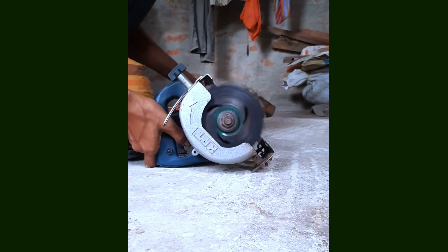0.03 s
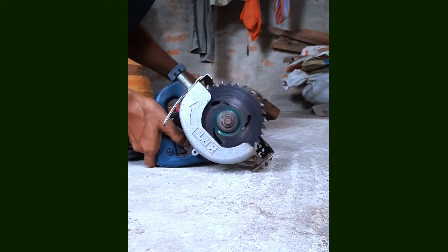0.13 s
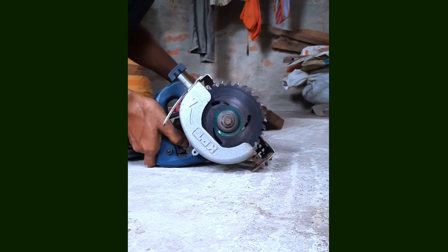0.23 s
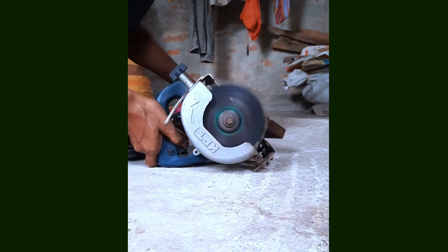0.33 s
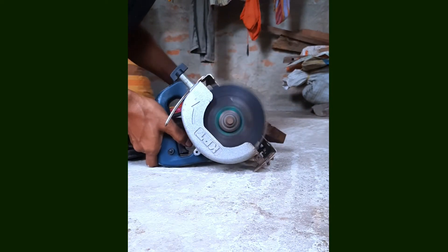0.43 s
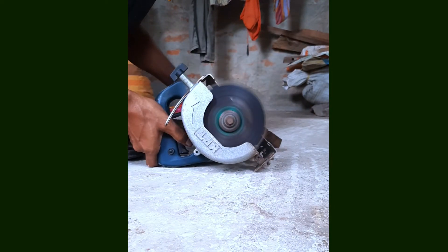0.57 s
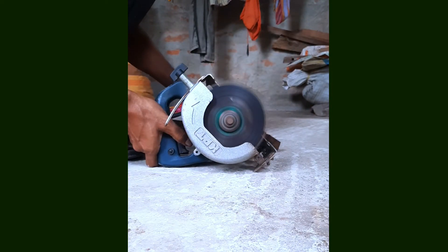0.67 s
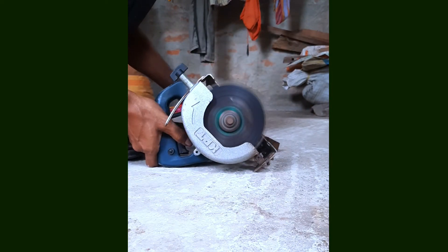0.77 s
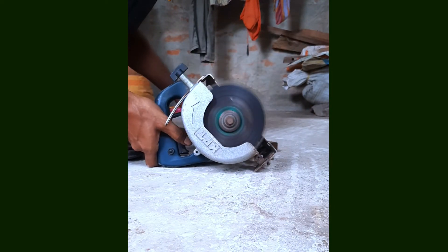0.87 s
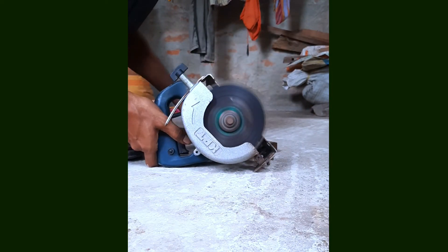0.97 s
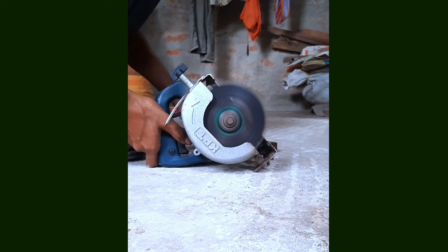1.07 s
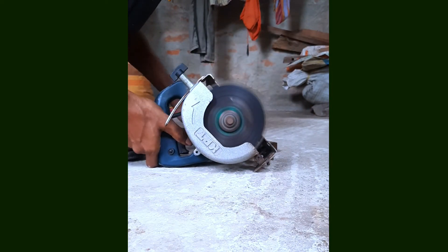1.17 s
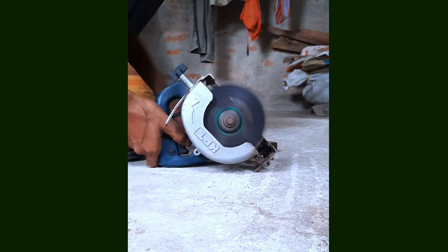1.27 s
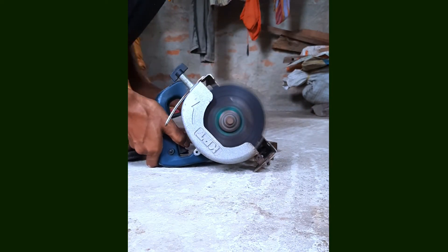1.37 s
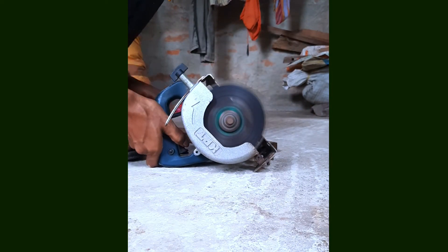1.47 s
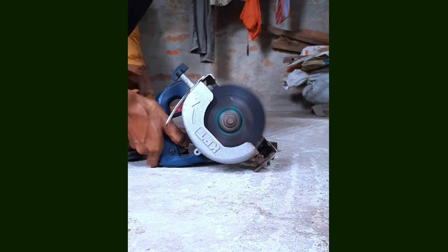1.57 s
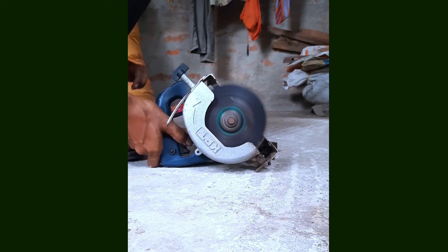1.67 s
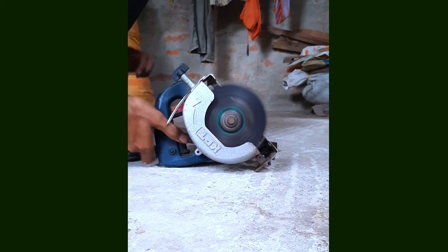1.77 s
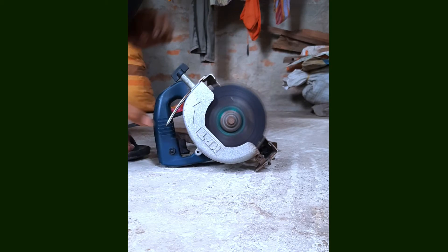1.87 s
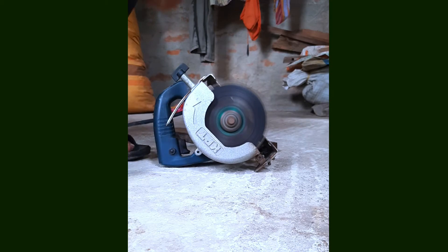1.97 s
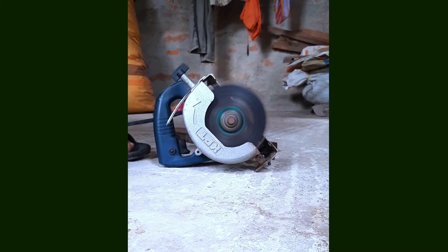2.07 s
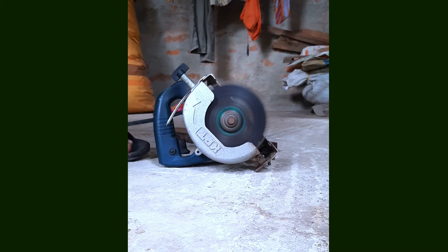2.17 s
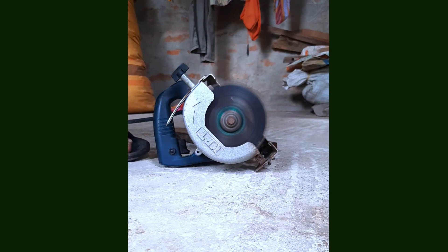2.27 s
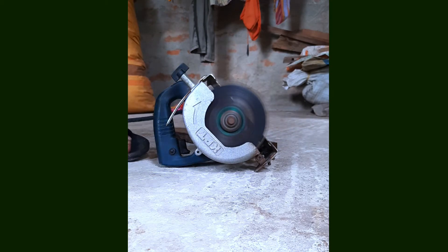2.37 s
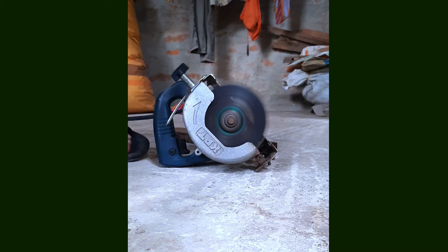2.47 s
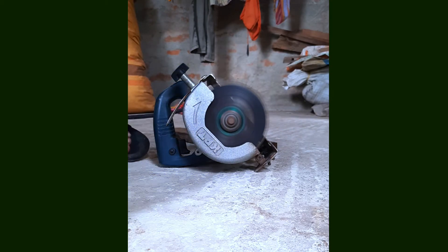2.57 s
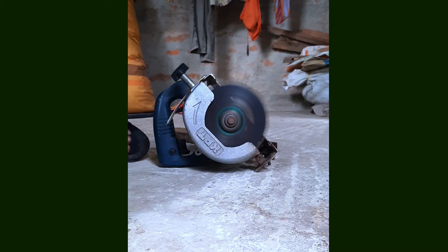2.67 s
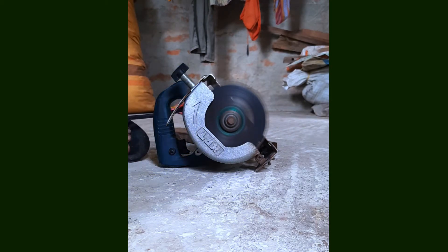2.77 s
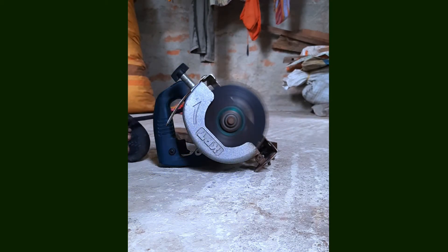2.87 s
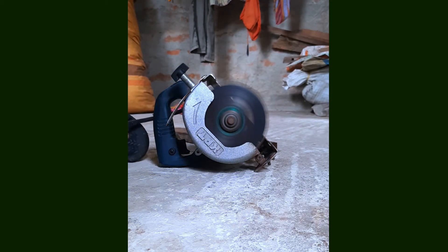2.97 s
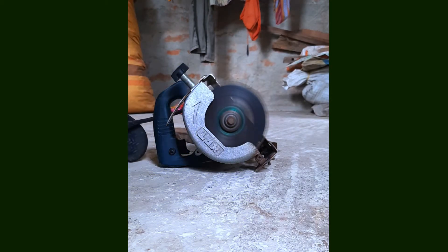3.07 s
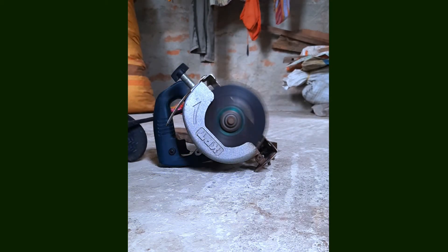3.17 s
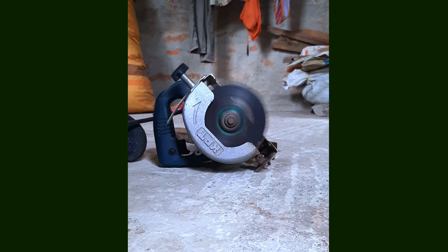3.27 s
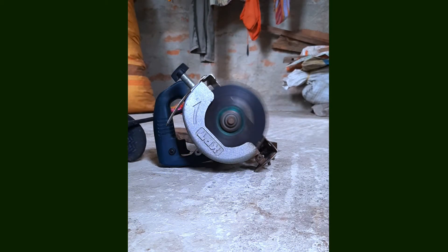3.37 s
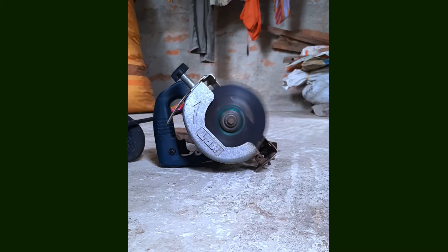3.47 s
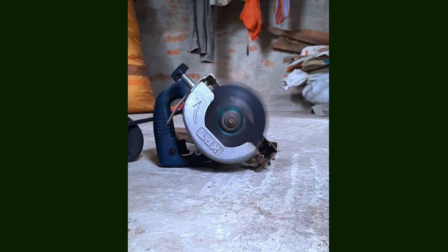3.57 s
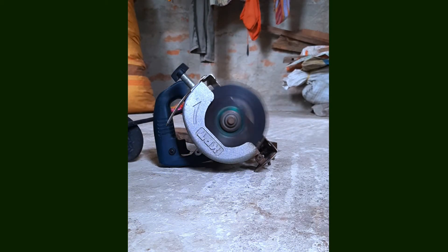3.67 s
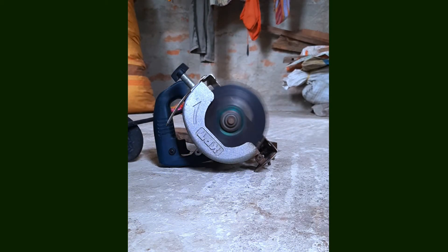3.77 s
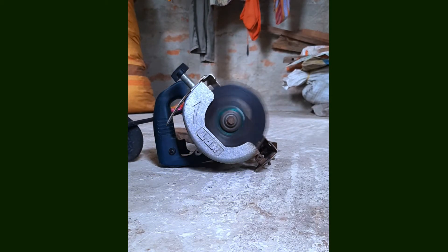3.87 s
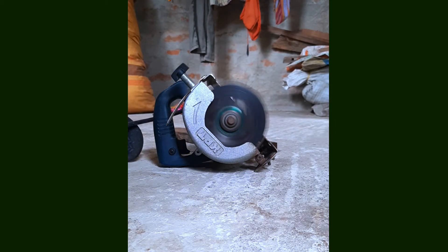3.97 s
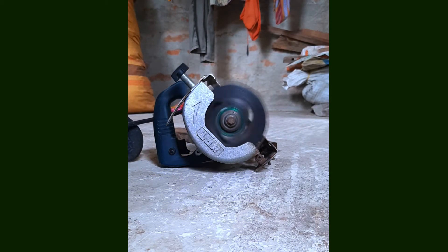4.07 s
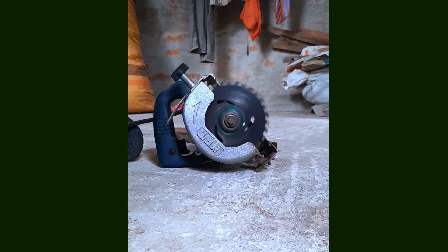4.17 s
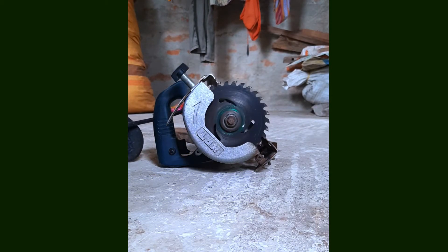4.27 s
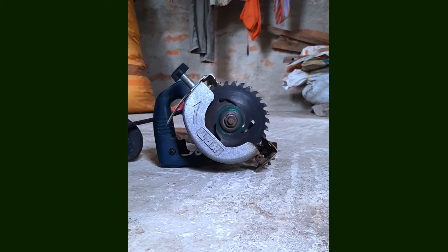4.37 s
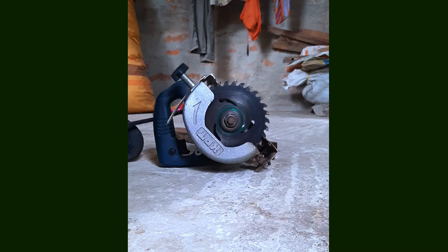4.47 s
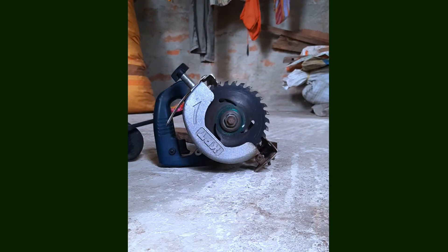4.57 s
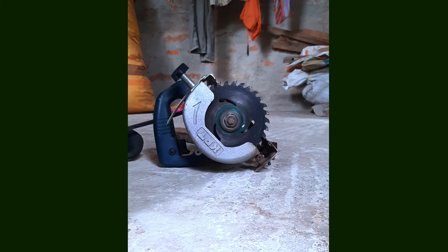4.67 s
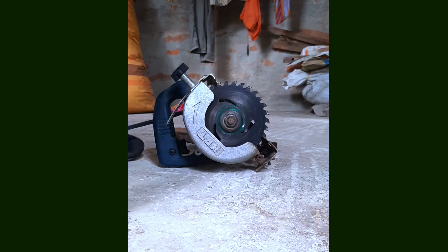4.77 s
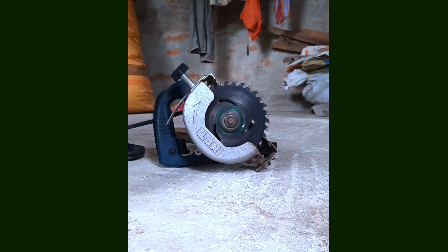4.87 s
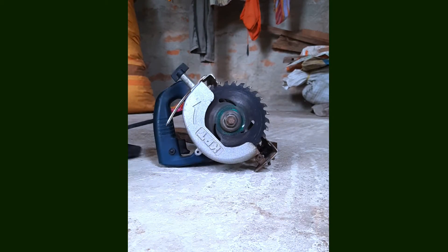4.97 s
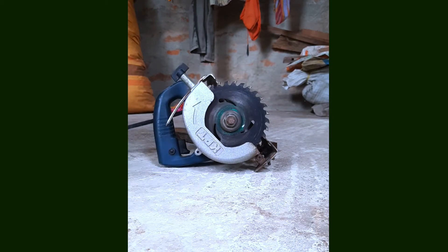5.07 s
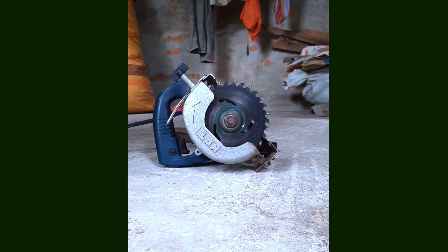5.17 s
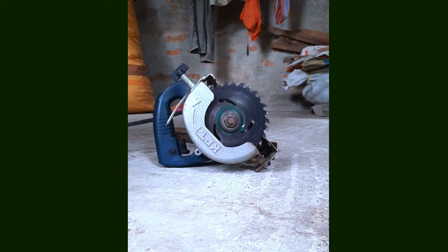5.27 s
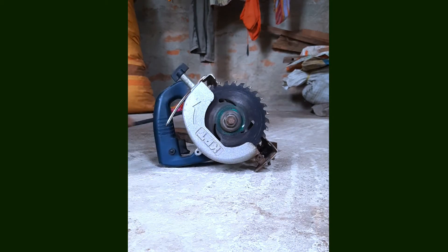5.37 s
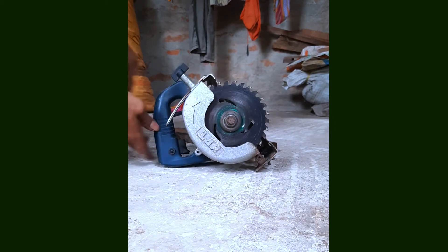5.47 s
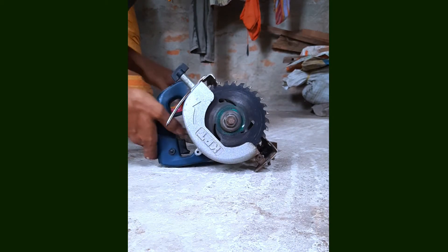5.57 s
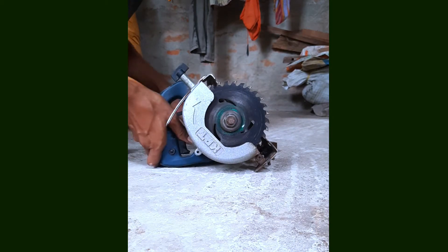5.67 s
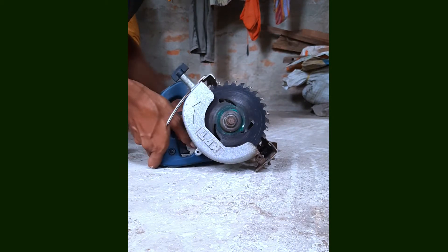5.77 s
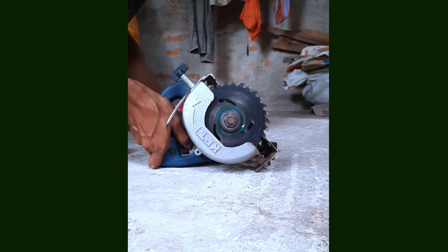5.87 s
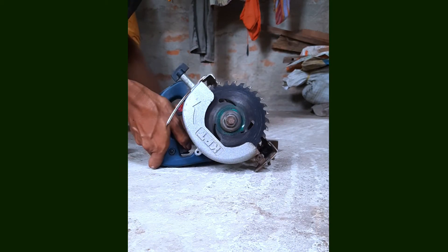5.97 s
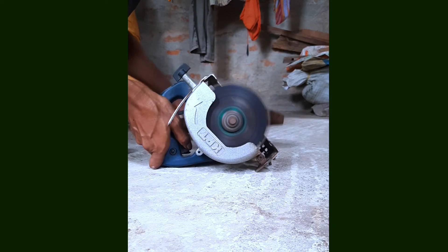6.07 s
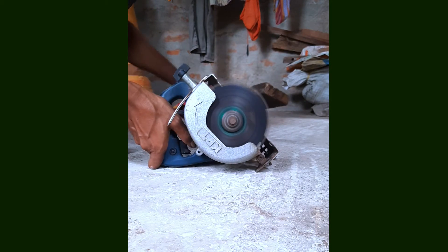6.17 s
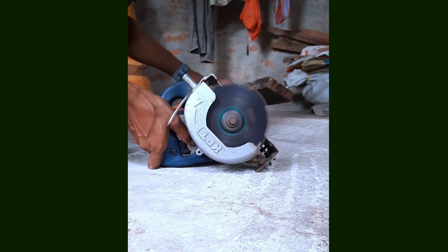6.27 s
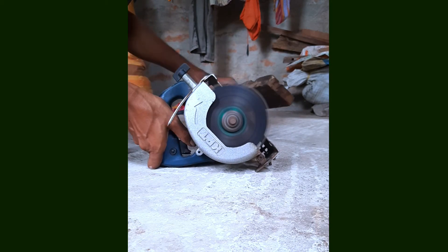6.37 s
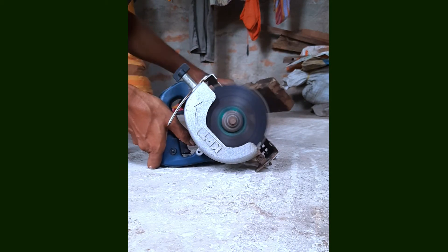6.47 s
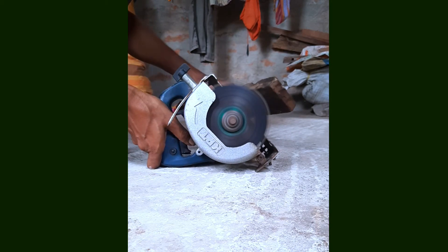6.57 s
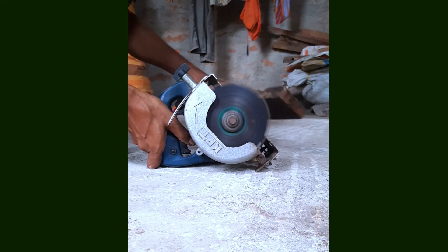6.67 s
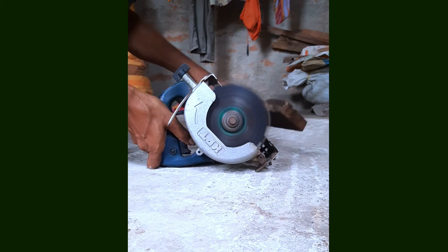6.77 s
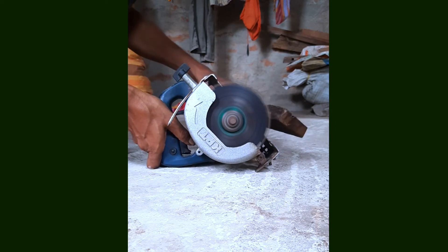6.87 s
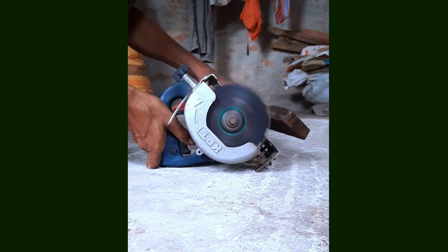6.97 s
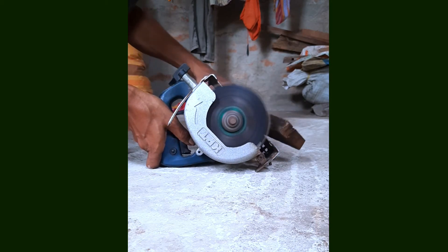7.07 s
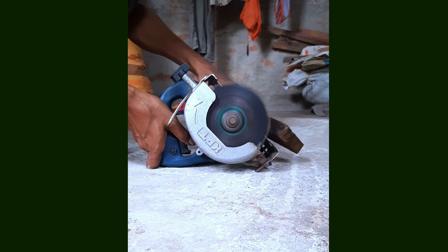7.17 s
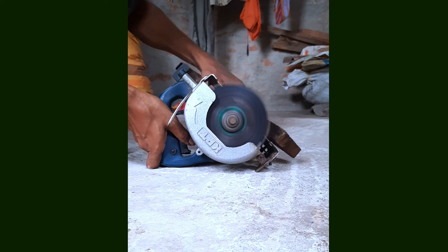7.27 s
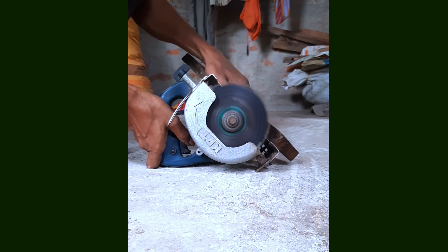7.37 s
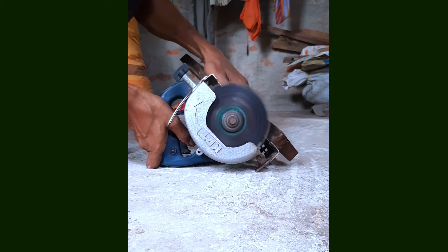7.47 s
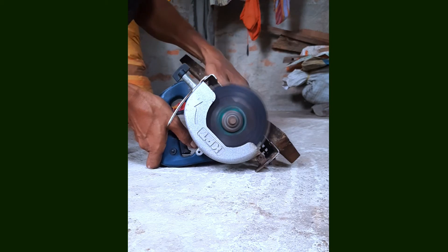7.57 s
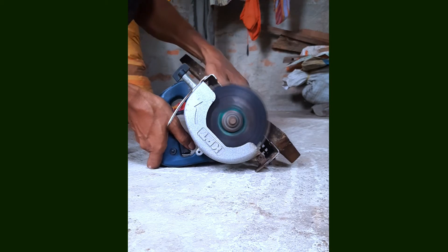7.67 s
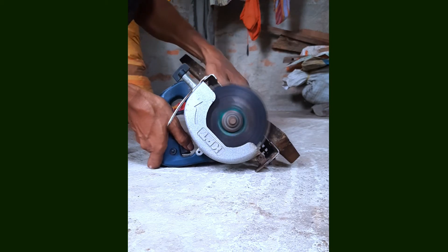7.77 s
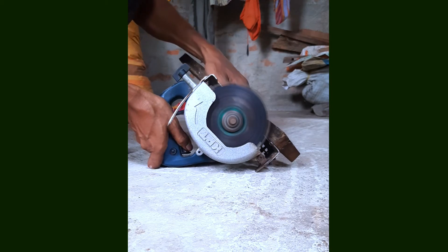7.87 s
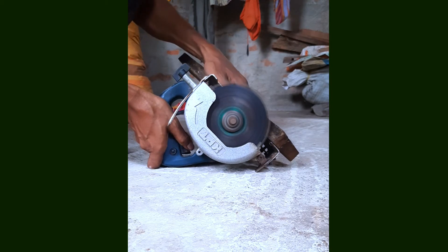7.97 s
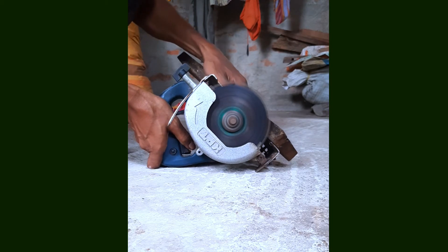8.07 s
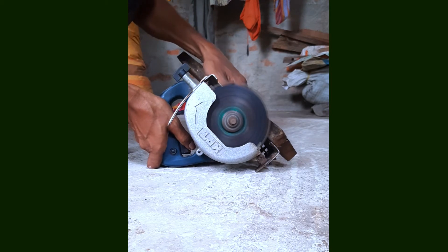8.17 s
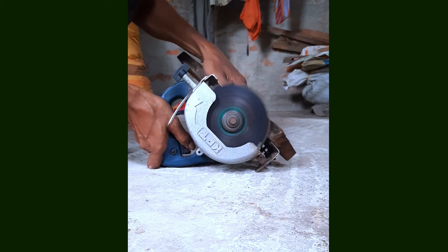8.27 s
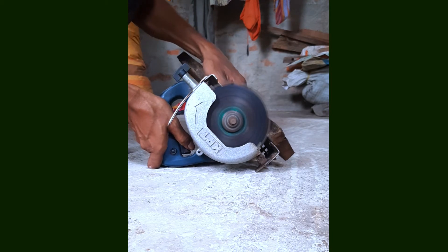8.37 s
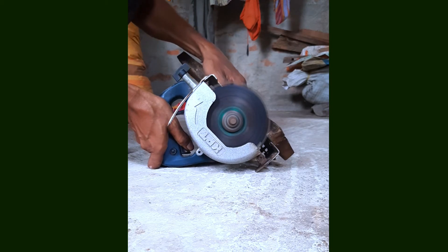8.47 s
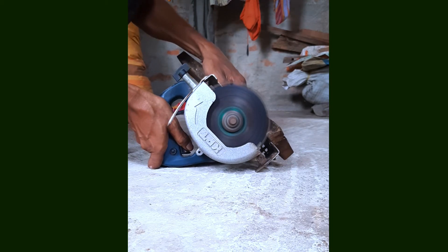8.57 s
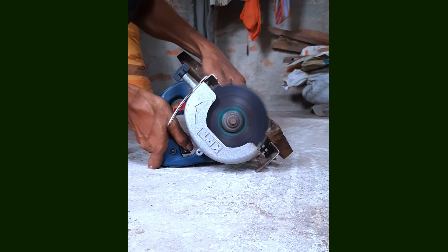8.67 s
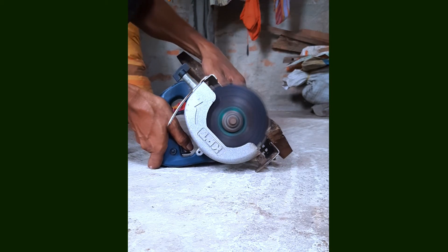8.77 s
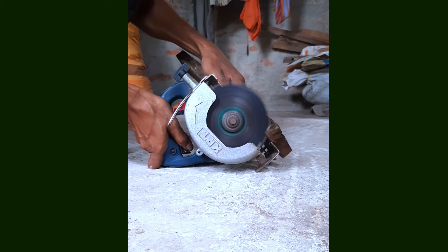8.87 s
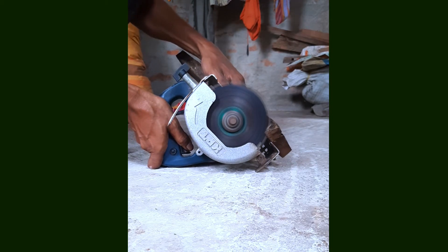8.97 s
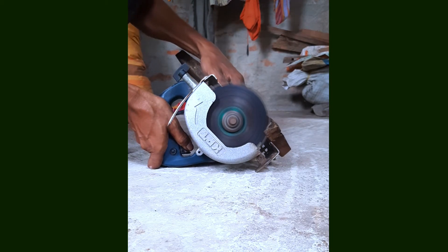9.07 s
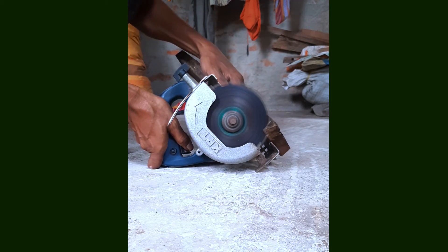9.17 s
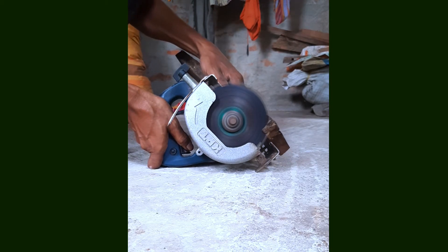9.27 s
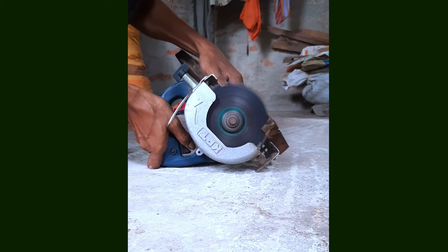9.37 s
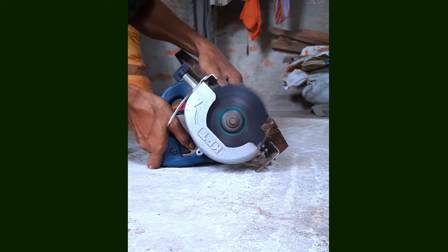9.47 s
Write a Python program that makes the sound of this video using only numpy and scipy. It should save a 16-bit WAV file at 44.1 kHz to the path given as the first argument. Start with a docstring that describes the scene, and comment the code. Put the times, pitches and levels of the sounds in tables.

```python
"""On a workshop floor a motor-driven saw with a toothed steel blade lies near a phone with two microphone ports.
The trigger is blipped four times: gear play knocks while current flows, then the whine, a sum of sines locked
to the rotor, sinks as friction brakes it; at last wood is pushed on the blade and noise bands and modes ring.
Dust puffs on the left port are damped swings and low noise; scuffs of hand and feet are filtered noise.
Engines idling outside are multiples of a firing rate over dull traffic noise and a steady hiss."""
import sys
import numpy as np
from scipy import signal
from scipy.fft import rfft, irfft, next_fast_len
from scipy.io import wavfile
from scipy.ndimage import uniform_filter1d

SR = 44100
rng = np.random.default_rng(int(sys.argv[2]) if len(sys.argv) > 2 else 0)


def transcribe(signal):
    """Save signal, clipped to [-1, 1], as a 16-bit WAV file at the path in sys.argv[1]."""
    frames = np.atleast_2d(signal).T
    limited = np.clip(frames, -1, 1)
    pcm = np.round(limited * 32767).astype(np.int16)
    wavfile.write(sys.argv[1], SR, pcm)


N = 419832
T = np.arange(N) / SR
SIZE = next_fast_len(N + SR // 2)
HZ = np.arange(SIZE // 2 + 1) * SR / SIZE + 1e-3  # the offset keeps divisions and logarithms finite

# Squeezes of the trigger. Each row: press in seconds, hold in seconds, gear mesh rate in Hz that the
# motor pulls towards, relative level in dB.
SPINS = [(.3845, .14, 2961, 0), (1.660, .14, 3223, .5), (6.0863, .1385, 3151, -0.27),
         (7.954, 0.164, 3260, 0.8)]
# The rotor under load, bogging down and recovering. Each row: time in seconds, mesh rate in Hz,
# whine in dB relative to the rattle.
LOADED = [(8.4, 2800, 0), (8.5, 2620, 0), (8.59, 2410, -3), (8.65, 2420, -12), (8.95, 2520, -12),
          (9.02, 2600, -3), (9.1, 2720, -3), (9.18, 2640, -12), (9.3, 2670, 0), (9.4, 2735, -1),
          (9.52, 2765, -5)]
# Loudness of the cut. Each row: time in seconds, rattle in dB, air hiss in dB, screech above 3 kHz
# in dB over the rattle (capped where it is used).
CUT = [(8.4, -30.5, -35.5, 0), (8.536, -27.5, -29, -2.5), (8.558, -26, -29, -2), (8.58, -28.5, -31.5, -1),
       (8.658, -27.5, -27.5, -3.5), (8.718, -24.5, -30, -5), (8.802, -24.5, -27, -1),
       (8.896, -28, -29.5, -6), (8.902, -27, -27.5, -2), (9.054, -27, -28, -5.5), (9.104, -26, -26.5, -7),
       (9.132, -28, -28.5, -4), (9.416, -25.5, -25.5, -5), (9.47, -28.5, -29.5, -3), (9.52, -25.5, -25, -7)]
# Wood on the blade. Each row: time in seconds, share that the blade rings 0-1, hum in dB.
BITE = [(8.4, 0, -40), (8.5, 0.9, -44.5), (8.6, 0.99, -50), (8.74, 0.93, -46), (8.86, 0.87, -41.5),
        (9.2, 0.58, -41), (9.35, 0.77, -38.5), (9.52, .55, -38.5)]
# Resonances of the housing. Each row: centre in Hz, width in Hz, relative level in dB.
HOUSING = [(440, 40, -7), (613, 18, -2), (690, 20, -4), (1216, 30, -7), (1433, 30, -2), (1606, 36, -3),
           (1816, 32, 1), (2181, 36, -4), (2440, 20, 4), (2716, 70, -2), (2803, 22, 2), (3363, 28, -4),
           (4326, 24, -2), (4420, 110, -9), (7550, 100, -12), (8780, 280, -17), (12100, 360, -18),
           (14150, 900, -15)]


def undb(db):
    """Amplitude ratio from decibels: 20 dB is a factor of ten."""
    return 10 ** (np.asarray(db) / 20)


def unit(x):
    """Normalisation to an RMS of one."""
    return x / np.sqrt(np.mean(x ** 2))


def over_hz(table):
    """Interpolation of (Hz, value) points on a logarithmic frequency axis."""
    hz, value = np.transpose(table)
    return np.interp(np.log(HZ), np.log(hz), value)


def over_time(table, column):
    """Linear interpolation in time of one column against the seconds in column 0."""
    columns = np.transpose(table)
    return np.interp(T, columns[0], columns[column])


def filt(x, gain):
    """Linear filtering: the spectrum is multiplied by a frequency response."""
    return irfft(rfft(x, SIZE) * gain, SIZE)[..., :N]


def band(x, lo_hz, hi_hz):
    """Zero-phase band-pass with fourth-order Butterworth magnitude at each edge."""
    return filt(x, 1 / np.sqrt((1 + (lo_hz / HZ) ** 8) * (1 + (HZ / hi_hz) ** 8)))


def modes(table):
    """Modal superposition: resonances of (Hz, width, dB) add with alternating sign."""
    total = 0
    for k, (hz, width, db) in enumerate(table):
        detuning = (HZ / hz - hz / HZ) * hz / width
        total = total + (-1) ** k * undb(db) / (1 + 1j * detuning)
    return total


def walk(rate):
    """Slow random modulation: levels held 1 / rate s, smoothed twice; spread near 1."""
    k = int(SR / rate)
    held = np.repeat(rng.standard_normal(N // k + 1), k)
    return 1.37 * uniform_filter1d(uniform_filter1d(held, k), k)[:N]


def lead():
    """Phase delay between spaced receivers: the left port leads by an angle that varies with frequency."""
    # Each row: frequency in Hz, lead of the left port in radians.
    phase_lead = [(0, 0), (690, 0.5), (1290, 1.5), (2240, 0.8), (2840, 1.5), (3450, 2.5), (4390, 6),
                  (6200, 7.5), (8350, 6), (10200, 35), (12500, 10), (12800, 15), (14300, 25), (15200, 15),
                  (16400, 24.4)]
    return np.exp(1j * np.interp(HZ, *np.transpose(phase_lead)))


def noise_pair(gain):
    """Spatial coherence: spectra of noise at two ports, partly shared."""
    # Each row: frequency in Hz, likeness of the ports 0-1.
    coherence = [(100, 0.99), (500, 1), (1000, 0.57), (3000, 0.11), (8000, 0.03)]
    shared, own = rfft(rng.standard_normal((2, SIZE)))
    alike = np.clip(over_hz(coherence), 0, 1)
    left = alike * shared * lead() + np.sqrt(1 - alike ** 2) * own
    return np.array([left, shared]) * gain


def hiss(gain):
    """Coloured two-port noise of unit RMS, shaped by a spectral gain."""
    return unit(irfft(noise_pair(gain), SIZE)[:, :N])


def patchy(gain, levels_db, flicker_db, edges_hz):
    """Band-wise modulated noise: each band has its level curve, and its two slices flicker on their own."""
    pair, out = noise_pair(gain), 0
    for db, lo, hi in zip(levels_db, edges_hz, edges_hz[1:]):
        inside = (HZ >= lo) & (HZ < hi)
        scale = SIZE / np.sqrt(np.sum(abs(pair[:, inside]) ** 2))  # unit RMS for the whole band
        cuts = np.geomspace(lo, hi, num=3)
        for a, b in zip(cuts, cuts[1:]):
            piece = irfft(pair * (HZ >= a) * (HZ < b), SIZE)[:, :N]
            out = out + piece * scale * undb(db + flicker_db * walk(18))
    return out


def room(x, wet_db=-5, t60_s=0.24):
    """Reverberation: direct sound plus a different exponential tail of wall echoes at each port."""
    t = T[:SR // 2]
    tail = rng.standard_normal((2, len(t))) * undb(-60 * t / t60_s) * (t > .003)
    tail = tail / np.sqrt(np.sum(tail ** 2, 1, keepdims=True))
    echo = rfft(tail * undb(wet_db), SIZE)
    direct = np.array([lead(), np.ones(len(HZ))])
    return filt(x, direct + echo) / np.sqrt(1 + undb(2 * wet_db))


def pulses(hz, jitter, scatter_db):
    """Jittered point process: a train of clicks uneven in spacing and size."""
    gap, size = rng.standard_normal((int(N / SR * hz * 2), 2)).T
    at = (np.cumsum(np.clip(1 + jitter * gap, .1, 3)) / hz * SR).astype(int)
    out = np.zeros(N)
    out[at[at < N]] = undb(scatter_db * size[at < N])
    return out


def rings(rows, cycles):
    """Impulse response of damped oscillators at (s, dB, Hz), falling by a factor e in the given cycles."""
    out, t = np.zeros(N + SR // 4), T[:SR // 4]
    for s, db, hz in rows:
        swing = np.sin(2 * np.pi * hz * t) * np.exp(-t * hz / cycles)
        out[int(s * SR):][:len(t)] += undb(db) * swing
    return out[:N]


def noise_floor():
    """Stationary coloured noise, its level wavering slowly."""
    # Each row: frequency in Hz, relative density in dB per Hz.
    floor_colour = [(24, -45), (40, -14.5), (109, -4), (474, -15.5), (536, -23), (1820, -24.5), (2650, -28),
                    (5750, -31.5), (7560, -32), (10200, -80), (15600, -22.5)]
    floor = hiss(undb(over_hz(floor_colour)))
    level_db = -54.5 + 1.0 * walk(4.58)  # refers to the band from 260 to 18500 Hz
    return floor * undb(level_db) / np.std(band(floor, 260, 18500))


def engine(table, low, others):
    """Harmonic synthesis: multiples of a drifting firing rate, silent outside the span of the table."""
    s, hz, low_db, high_db = np.transpose(table)
    turn = 2 * np.pi * np.cumsum(np.interp(T, s, hz)) / SR
    low_db, high_db = (np.interp(T, s, db, -99, -99) for db in (low_db, high_db))
    out = undb(low_db) * np.sin(low * turn) + undb(high_db) * np.sin((low + 1) * turn + 1)
    for k, db in others:
        out = out + undb(high_db + db + 2.7 * walk(4.1)) * np.sin(k * turn + k * k)
    return np.sqrt(2) * out  # from peak to RMS levels


def engines():
    """Periodic firing yields harmonic drones through the walls, over band-limited noise of dull traffic."""
    # Each row: time in seconds, firing rate in Hz, level in dB of the 2nd and of the 3rd multiple.
    fast_engine = [(0.0, 36.6, -48, -59), (0.28, 36.6, -70, -67), (0.7, 37.9, -50, -57),
                   (1.33, 38, -54, -49), (1.61, 39, -44, -40), (1.75, 37.86, -57, -48),
                   (1.78, 37.5, -49, -72), (1.84, 35.6, -51, -55), (1.95, 37.9, -62, -56),
                   (2.64, 37.6, -53, -58), (3.2, 35.9, -49, -70), (3.34, 38.07, -57, -53.5),
                   (3.78, 37.18, -48.5, -50.5), (3.83, 38.5, -48, -48), (3.97, 38.26, -67, -59),
                   (4.09, 35.85, -52, -58), (4.33, 37.9, -56, -69), (4.6, 35.7, -75, -69)]
    # Each row: time in seconds, firing rate in Hz, level in dB of the 5th and of the 6th multiple.
    slow_engine = [(4.4, 28.2, -66, -64), (4.67, 28.85, -57, -57.5), (5.18, 28.88, -51, -49),
                   (5.45, 28.42, -57, -57), (5.49, 28.76, -59, -50.5), (5.76, 29.23, -49, -54),
                   (5.86, 29.54, -45.5, -46), (6.08, 29.54, -53, -48), (6.14, 29.63, -73, -65),
                   (6.27, 29.63, -52, -58), (6.56, 29.28, -65, -66), (6.65, 29.44, -48, -52),
                   (6.82, 29.13, -52, -48), (7.07, 28.9, -68, -62), (7.16, 29.24, -49.5, -47.5),
                   (7.92, 29.14, -47.5, -46.5), (8.12, 29.66, -60, -56), (8.37, 29.35, -53.5, -50),
                   (8.49, 29.2, -64, -68), (8.6, 29.1, -50, -54)]
    # Each row: multiple of the firing rate, mean level in dB over the 3rd.
    fast_orders = [(2.5, -9), (3.5, -13), (5, -16), (7, -16)]
    # Each row: multiple of the firing rate, mean level in dB over the 6th.
    slow_orders = [(4, -8), (7, -13), (8, -11), (9, -13)]
    # Traffic. Each row: time in seconds, level in dB.
    traffic = [(0, -90), (1.6, -52), (2.9, -60), (4.3, -53.5), (5.2, -49.5), (5.9, -43.5), (6.5, -63),
               (7.2, -58), (8, -45.5), (8.5, -69)]
    boom = unit(band(rng.standard_normal(N), 61, 270.0)) * undb(over_time(traffic, 1))
    drone = engine(fast_engine, 2, fast_orders) + engine(slow_engine, 5, slow_orders)
    return room(drone + boom, -46.0)


def scuffs():
    """Friction noise of skin and cloth on plastic and concrete; a few damped taps; a faint far whistle."""
    # Feet and clothes shuffling. Each row: time in seconds, relative level in dB, that of a dull drag in dB.
    shuffle = [(0.0, -51, -76), (.1, -57, -78), (.14, -80, -78), (4.25, -73, -59.5), (4.4, -64, -60),
               (4.65, -64, -58), (4.69, -63, -56), (4.76, -59, -53), (4.79, -60, -53.5), (4.88, -60, -52),
               (4.93, -57, -50.5), (5.0, -59, -53), (5.06, -54, -55), (5.1, -54, -55), (5.3, -57, -51.5),
               (5.52, -56.5, -57), (5.55, -51, -58), (6.0, -68, -55), (6.08, -52, -54), (6.1, -90, -92)]
    # A hand on the tool. Each row: start in seconds, length in seconds, relative level in dB.
    rubs = [(5.208, 0.018, -57), (5.55, 0.2, -47.5), (5.761, 0.012, -39.5), (5.802, 0.054, -40),
            (5.867, 0.11, -47)]
    # Resonances of the tool body. Each row: centre in Hz, width in Hz, relative level in dB.
    tool_body = [(738, 120, 0), (1440, 80, -3), (1850, 70, 3), (2450, 70, 1), (2820, 60, -2)]
    # Each row: time in seconds, relative level in dB, ring in Hz.
    tap_rows = [(4.91, -38, 377), (4.93, -39, 333), (4.95, -44, 300), (5.211, -35, 1020),
                (5.558, -35, 1270), (5.766, -36, 2200)]
    attack_s, fade_db_per_s = 0.0062, 244  # of each rub
    power = undb(2 * over_time(shuffle, 1))
    for on, length, rub_db in rubs:
        fade_db = fade_db_per_s * np.clip(T - on - length, 0, 1)
        power = power + np.clip((T - on) / attack_s, 0, 1) * undb(2 * (rub_db - fade_db))

    contact = modes([(1960, 2000, 5), (15000, 630, -28)])
    colour = np.hypot(abs(contact), abs(modes(tool_body)))
    colour = np.hypot(colour, undb(-38))  # a flat minimum that fills the treble
    drag = hiss(colour) * np.sqrt(power) * undb(1.0 * walk(18))
    dull = hiss(abs(modes([(706, 1600, 0)])) ** 2) * undb(over_time(shuffle, 2) + 1.2 * walk(30))

    on, off = 4.5, 5.6  # seconds
    whistle = hiss(abs(modes([(4140, 110, 0)])) ** 2) * undb(-68)  # a narrow band of noise
    whistle = whistle * np.interp(T, [on, on + .2, off, off + 0.39], [0, 1, 1, 0])
    taps = undb(4) * rings(tap_rows, 1.8)
    return (drag + dull) * undb(0.49 * walk(70) + 1.5) + whistle + room(taps)


def dust():
    """Pressure buffeting: air and chips thrown off the blade strike the ports, mostly the left."""
    # Each row: time in seconds, level at the left port in dB, ring in Hz.
    puffs = [(8.589, -9.5, 91.5), (8.665, -10, 100), (8.7, -9, 84.5), (8.721, -11, 81), (8.764, -15, 123.7),
             (8.803, -8, 203), (8.828, -3, 398), (8.844, -8, 94), (8.915, -7, 137), (9.129, -9, 73),
             (9.239, -11, 396), (9.309, -12, 238), (9.334, -10, 348), (9.349, -10, 82.5), (9.385, -15, 110)]
    # Turbulent rumble. Each row: time in seconds, relative level in dB.
    blast = [(8.45, -61), (8.53, -48.5), (8.7, -42), (8.94, -40.5), (9.15, -43.5), (9.19, -49), (9.35, -40),
             (9.5, -53)]
    out = rings(puffs, 0.21) * undb([[0], [-35]])  # left, right
    rumble = unit(band(rng.standard_normal((2, N)), 55, 430)) * undb([[4.0], [-8.0]])
    blast_db = np.interp(T, *np.transpose(blast), -99)
    return out + rumble * undb(blast_db + 1.8 * walk(40))


def rotor():
    """Equation of motion: the motor pulls up to speed, friction and fan brake it, wood then sets the pace."""
    step, hz, out = .001, 0., []
    run_up_s = .025  # time constant
    # braking of the mesh rate: dry friction in Hz per s, grease per Hz, fan per Hz squared
    friction, grease, fan = 1040, .1136, 2.8e-5
    for t in np.arange(0, N / SR + step, step):
        top = [peak for on, held, peak, *_ in SPINS if on <= t < on + held]
        if top:
            change = (top[0] - hz) / run_up_s
        else:
            change = -friction - grease * hz - fan * hz ** 2
        hz = max(hz + step * change, 0)
        out.append(hz)
    free = np.interp(T, step * np.arange(1, len(out) + 1), out)
    return np.where(T < LOADED[0][0], free, over_time(LOADED, 1))


def loudness(mesh_hz):
    """Radiated level follows speed when coasting, is lifted by torque, then follows the cut."""
    # Coasting. Each row: mesh rate in Hz, housing rattle in dB, body hum in dB, air hiss in dB.
    coasting = [(0, -67, -70, -80), (159.7, -51.5, -62, -65), (419.3, -45, -68, -56.5),
                (800, -40.5, -59, -48.5), (1340, -38, -53.5, -44), (1580, -38, -51, -44),
                (2060, -36, -46.5, -41.5), (2570, -32.5, -43, -40), (3280, -30, -40, -36)]
    # Levels at full torque in dB: rattle, hum, air.
    torque_levels = (-24, -39, -32)
    # Reduction at the press in dB: rattle, hum, air.
    lag_depths = (5.5, 5.5, 3)
    lag_s = 0.058  # time constant of the build-up
    full_torque_s, torque_tail_s = 0.07, 0.033  # torque holds, then tapers out just after release
    beat_hz, beat_dip_db = 117, 7  # the rattle sinks between torque beats

    on, held, _, spin_db = np.transpose(SPINS)
    spin = np.clip(np.searchsorted(on, T, "right") - 1, 0, None)
    since = T - on[spin]
    end = held[spin] + torque_tail_s
    torque = np.clip((end - since) / (end - full_torque_s), 0, 1) * (since >= 0)
    starting = np.exp(-abs(since) / lag_s)

    hz, *coast = np.transpose(coasting)
    free = []
    for coast_db, full_db, lag_db in zip(coast, torque_levels, lag_depths):
        driven_db = full_db - lag_db * starting
        free.append((1 - torque) * np.interp(mesh_hz, hz, coast_db) + torque * driven_db + spin_db[spin])
    free[0] = free[0] - beat_dip_db * torque * (since * beat_hz % 1 - .5)
    cut = over_time(CUT, 1), over_time(BITE, 2), over_time(CUT, 2)
    cutting = T >= CUT[0][0]
    return [np.where(cutting, c, np.where(mesh_hz > 0, f, -99)) for f, c in zip(free, cut)]


def whine(mesh_hz, power, bite):
    """Gear mesh modulation: side tones lie a rotor turn apart; wood on the blade roughens the pitch."""
    # Each row: cycles per rotor turn, relative level in dB when coasting, relative level in dB when powered.
    rotor_orders = [(1, -22, -13), (2, -22, -3), (11, -18, -22), (12, 1, -14), (13, -17, -22),
                    (16, -15, -22), (17, -16, -22), (18, -14, -22), (19, -7, -22), (20, -13, -22),
                    (23, -14, -22), (24, -3, -20), (25, -14, -22), (28, -15, -22), (36, -13, -22),
                    (39, -11, -22), (48, -15, -22), (60, -9, -22)]
    pinion_teeth, waver_db = 12, 2.8
    wander = (0.00042 + 0.0014 * bite) * walk(60)
    turn = 2 * np.pi * np.cumsum(mesh_hz * (1 + wander)) / SR / pinion_teeth
    total = 0
    for k, coast_db, on_db in rotor_orders:
        level_db = coast_db + power * (on_db - coast_db) + waver_db * walk(28) + 0.5
        total = total + undb(level_db) * np.sin(k * turn)
    return total


def knocks(push):
    """Impact excitation: torque pulses slam the gear play shut while current flows; the housing rings."""
    # Hard knocks. Each row: time in seconds, relative level in dB, ring in Hz.
    hard_knocks = [(0.3843, -7.5, 2620), (0.3972, -4, 2610), (0.4068, -12, 2840), (0.4166, -5, 2660),
                   (0.4263, -11, 2150), (0.4331, -8, 2370), (0.4415, -17, 2445), (0.4496, -17, 1790),
                   (0.4589, -18, 2580), (0.4666, -16.7, 3850), (0.498, -16.6, 4240), (1.6595, -9, 2437),
                   (1.6687, -7, 2400), (1.678, -6.5, 1960), (1.6866, -6, 2690), (1.7014, -9, 2470),
                   (1.7111, -13, 2370), (1.7212, -15, 2470), (1.7371, -19, 4330), (1.7454, -12, 3600),
                   (1.7531, -16.1, 3600), (1.7614, -28, 1880), (6.0869, -5.5, 2500), (6.0953, -8, 1830),
                   (6.1049, -6, 2420), (6.1139, -7, 2530), (6.1227, -11, 2450), (6.1315, -9, 2150),
                   (6.1384, -19, 2610), (6.1472, -10, 2520), (6.1545, -16, 3320), (6.1954, -14, 2410),
                   (6.2069, -13, 2310), (7.957, -14, 1960), (7.9653, -9, 2220), (7.9735, -8, 2250),
                   (7.9819, -16, 4390), (7.9991, -7, 2860), (8.0091, -14, 2710), (8.0165, -19, 2400),
                   (8.0357, -10, 4320), (8.0434, -15.2, 4270), (8.059, -11, 4490), (8.0687, -13, 4390),
                   (8.0788, -13, 4410)]
    body = modes([(1940, 370, 8.3), (2500, 3300, 3.0), (3900, 1670, 8.3)]) + .5 * modes(HOUSING)
    small = pulses(390, .6, 1.7)  # knocks between the hard ones
    small_rung = filt(small * push, body) / np.std(filt(small, body))
    return small_rung + undb(-2) * band(rings(hard_knocks, 3), 1250, 9000)


def singing(db):
    """Modal excitation: the teeth drive one blade mode after another, a tone in a narrow rasp."""
    # Some modes climb as the kerf closes round the blade. Each row: start in seconds, end in seconds,
    # first frequency in Hz, last frequency in Hz, relative level in dB over the rattle.
    blade_songs = [(8.46, 8.76, 2800, 2800, -8), (8.52, 8.9, 2445, 2455, -11), (8.82, 9.02, 2810, 2803, -7),
                   (9.04, 9.24, 2712, 2716, -8), (9.22, 9.33, 2820, 2800, -9), (9.4, 9.56, 2712, 2720, -8),
                   (8.41, 8.47, 3205, 3205, -12), (8.58, 8.76, 3615, 3632, -14),
                   (8.75, 8.88, 3362, 3362, -10), (8.8, 8.88, 3807, 3807, -13),
                   (9.22, 9.42, 3750, 3745, -13), (9.18, 9.32, 3355, 3370, -13),
                   (8.46, 8.82, 4326, 4330, -11), (8.88, 9.12, 4350, 4344, -11),
                   (9.4, 9.56, 4365, 4365, -10), (8.75, 8.83, 4918, 4918, -13),
                   (8.55, 8.74, 8700, 8735, -10), (8.78, 8.88, 9900, 9900, -14),
                   (8.46, 8.78, 13590, 13570, -8), (8.54, 8.74, 15270, 15220, -8),
                   (8.68, 9.1, 11700, 12190, -11), (9.08, 9.5, 12190, 12370, -11),
                   (8.76, 9.16, 13840, 14200, -10), (9.12, 9.56, 14220, 14300, -7),
                   (8.88, 9.12, 14500, 14620, -12)]
    fade_s, sharpness, pure_tone = .04, 45, .35
    out = np.zeros((2, N))
    start = int(CUT[0][0] * SR)
    t = T[start:]
    for on, off, first_hz, last_hz, mode_db in blade_songs:
        hz = np.interp(t, [on, off], [first_hz, last_hz])
        turn = 2 * np.pi * np.cumsum(hz) / SR + rng.uniform(0, 2 * np.pi, (2, 1))  # a phase for each port
        a, b = (walk(first_hz / sharpness)[:len(t)] for _ in range(2))
        swell = np.clip(np.minimum(t - on, off - t) / fade_s, 0, 1) * undb(db[start:] + mode_db)
        out[:, start:] += swell * ((pure_tone + a) * np.sin(turn) + b * np.cos(turn))
    return out


def saw():
    """Source-filter model: rattle in the housing, blade ringing under the wood, air off the teeth."""
    # Each row: frequency in Hz, relative density in dB per Hz.
    housing_hiss = [(120, -46), (200, -10), (293, -12), (437, -11.5), (534, -11.5), (618, -8), (741, -6.5),
                    (1150, -7), (2290, -6.5), (2420, -7), (3290, -5), (4330, -5), (10500, -20.5),
                    (13900, -18.5), (15400, -17.5)]
    # Resonances of the blade. Each row: centre in Hz, width in Hz, relative level in dB.
    blade_modes = [(608, 33, -8), (1210, 31, -8), (1440, 30, -9), (1810, 44, -7), (2000, 27, -9),
                   (2445, 24, -3), (2715, 90, -2), (2803, 14, 3), (3055, 24, -7), (3360, 28, -5),
                   (3630, 46, -9), (4328, 18, -2), (4420, 60, -8), (4910, 35, -10), (5860, 220, -12),
                   (7620, 300, -11), (8700, 260, -9), (9900, 36, -12), (11500, 50, -11), (12110, 200, -13),
                   (12900, 110, -13), (13590, 30, -12), (14290, 120, -11), (15220, 24, -11)]
    # Each row: frequency in Hz, relative density in dB per Hz.
    blade_hiss = [(180, -42), (300, -24), (534, -18), (900, -15), (2270, -14), (3000, -11), (4310, -11),
                  (6400, -20), (8750, -22), (10800, -23), (14100, -19), (15400, -15)]
    # The housing as a speaker. Each row: frequency in Hz, gain in dB.
    radiation = [(120, -30), (240, -10), (500, -14), (600, -26), (850, -22), (1050, -14), (1500, -13),
                 (1900, -7), (2100, -3), (2250, -4), (2420, 2), (2545, -8), (2720, 1), (2830, -3),
                 (2950, 1), (3050, -3), (3200, 0), (3500, -3), (3900, -4), (4300, -6), (4550, -11),
                 (4800, -17), (5500, -19), (7000, -15), (9200, -15), (11000, -28)]
    # Short ringing ticks while the whine sinks, spaced a little wider as it slows. # Each row: time in seconds,
    # relative level in dB, ring in Hz.
    resonance_ticks = [(0.8464, -23, 2500), (0.875, -19, 2430), (0.8996, -23, 2400), (1.006, -20, 2830),
                       (1.06, -16, 3080), (1.1174, -16, 2830), (1.1533, -25, 2700), (1.2012, -17, 2480),
                       (1.259, -17, 2480), (1.2815, -21, 2480), (1.3202, -18, 2500), (1.387, -20, 2400),
                       (2.3276, -20, 2450), (2.381, -25, 2340), (2.4945, -15, 2810), (2.5476, -18, 2750),
                       (2.583, -16, 2800), (2.667, -22, 2660), (2.7062, -26, 2697), (2.7303, -26, 2426),
                       (2.8414, -30, 2430), (6.7524, -39, 2320), (6.8129, -24, 2400), (6.8668, -22, 2450),
                       (6.929, -16, 2420), (6.989, -15, 2680), (7.0568, -17, 2690), (7.1157, -18, 2440),
                       (7.1643, -29, 2474), (7.2374, -22, 2480)]
    current_dies_s = .012  # time constant
    mesh_hz = rotor()
    rattle_db, hum_db, air_db = loudness(mesh_hz)
    power = sum((T >= on) * np.exp(-np.clip(T - on - held, 0, 1) / current_dies_s) for on, held, *_ in SPINS)
    bite = np.clip(over_time(BITE, 1), 0, 1)
    screech_db = np.minimum(over_time(CUT, 3), -1)

    housing_colour = np.hypot(abs(modes(HOUSING)), undb(over_hz(housing_hiss) - 2.0))
    housing_db = (hum_db, rattle_db - 1.8 * power, air_db)
    housing = patchy(housing_colour, housing_db, 0.65, (180, 1000, 6500, 16000))
    blade_colour = np.hypot(abs(modes(blade_modes)), undb(over_hz(blade_hiss) - 0.5))
    blade_db = (hum_db, rattle_db - 3.5, rattle_db + screech_db, air_db)
    blade = patchy(blade_colour, blade_db, 0.55, (180, 1000, 3100, 6500, 16000))
    # teeth and bearings catch unevenly
    chatter = undb((0.81 + 0.6 * bite) * walk(30) + 0.75 * walk(150) + 2.0)
    noise = chatter * (np.sqrt(1 - bite) * housing + np.sqrt(bite) * blade)

    tones = whine(mesh_hz, power, bite) * undb(rattle_db + over_time(LOADED, 2))
    tones = filt(tones, undb(over_hz(radiation)))
    clatter = knocks(power * undb(rattle_db)) + undb(-2) * rings(resonance_ticks, 4)
    return noise + singing(rattle_db) + room(tones + clatter, -12)


def scene():
    """Superposition: saw and scuffs, tilted between the ports, add to engines, dust and hiss."""
    # Each row: frequency in Hz, left minus right level in dB.
    port_balance = [(60, -2), (110, 4), (200, 0), (380, 1.5), (700, -3), (1290, 0), (2380, -3),
                    (4400, -0.5), (8120, 0.0), (15000, 3)]
    lean = undb(np.outer([.5, -.5], over_hz(port_balance)))
    return noise_floor() + engines() + dust() + filt(scuffs() + saw(), lean)


def record(dry):
    """Band limitation: the microphone drops the deep bass; the phone cuts the top steeply."""
    top_hz = 15390
    thin = signal.sosfilt(signal.butter(3, 58, "high", fs=SR, output="sos"), dry)
    return signal.sosfilt(signal.ellip(12, .2, 80, top_hz, fs=SR, output="sos"), thin)


dry = scene()
out = record(dry)
transcribe(out)
```